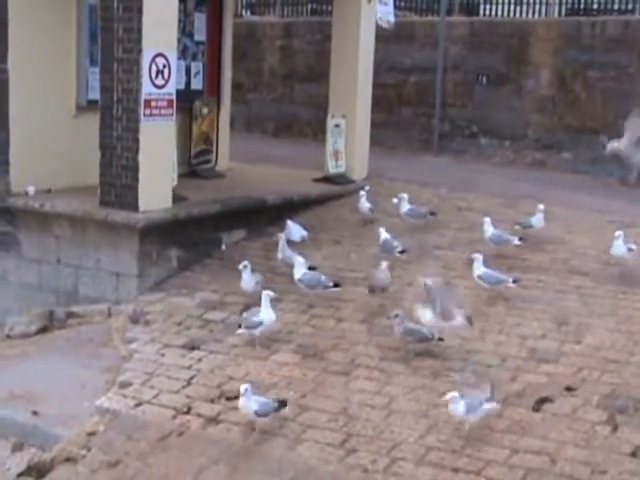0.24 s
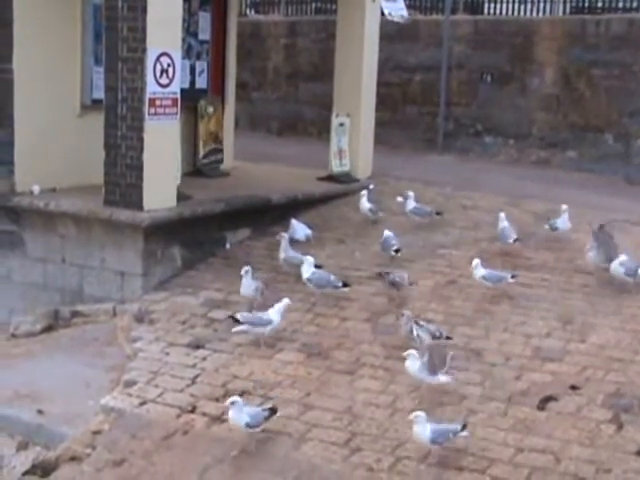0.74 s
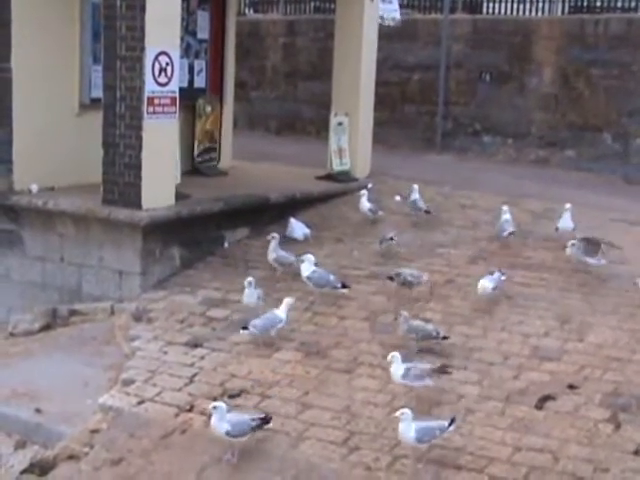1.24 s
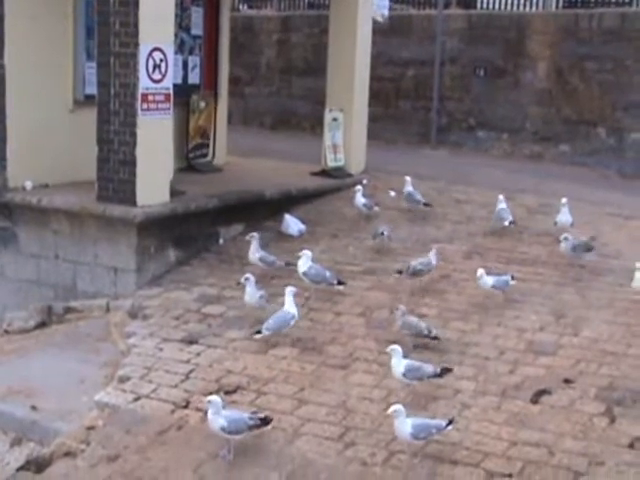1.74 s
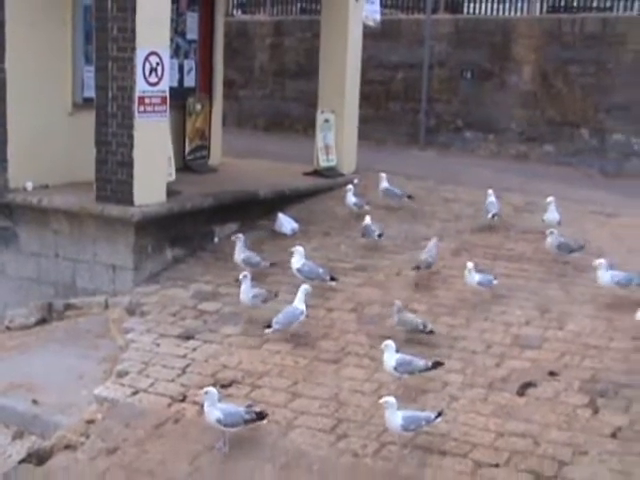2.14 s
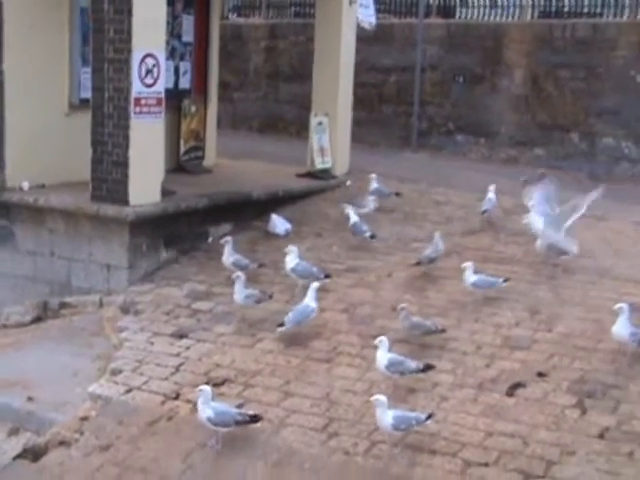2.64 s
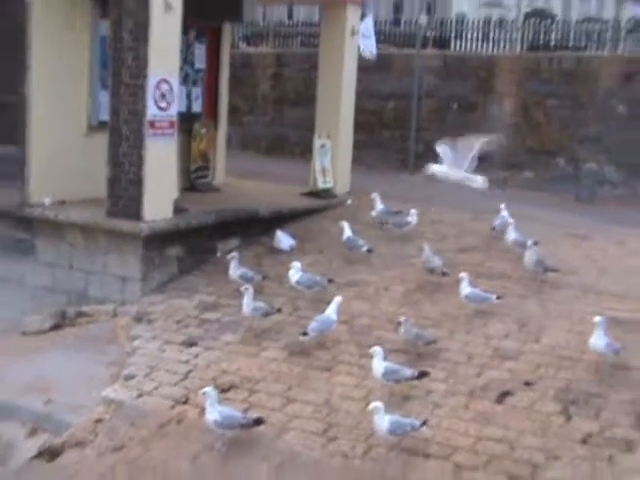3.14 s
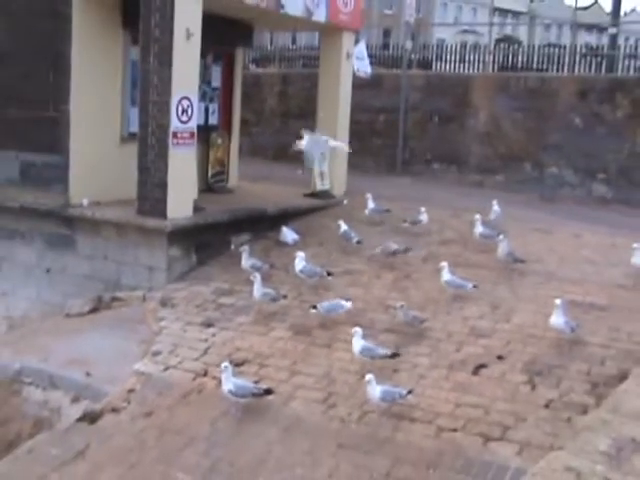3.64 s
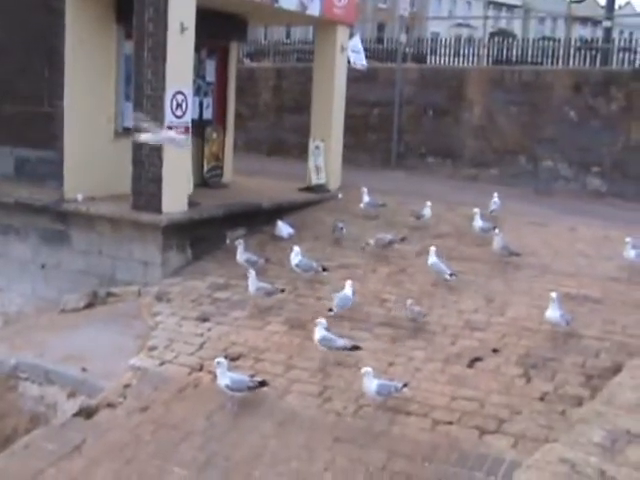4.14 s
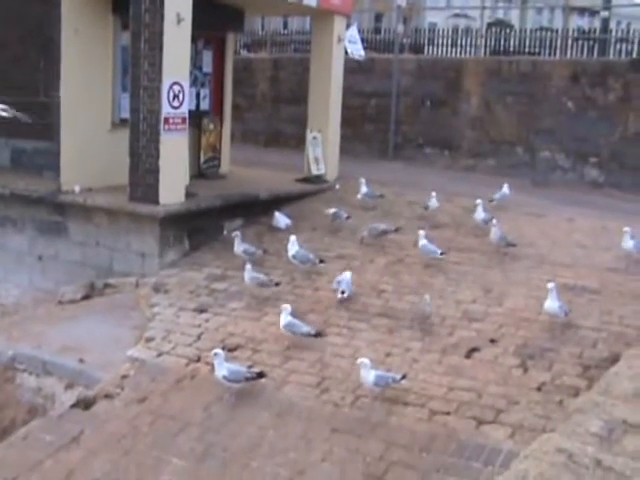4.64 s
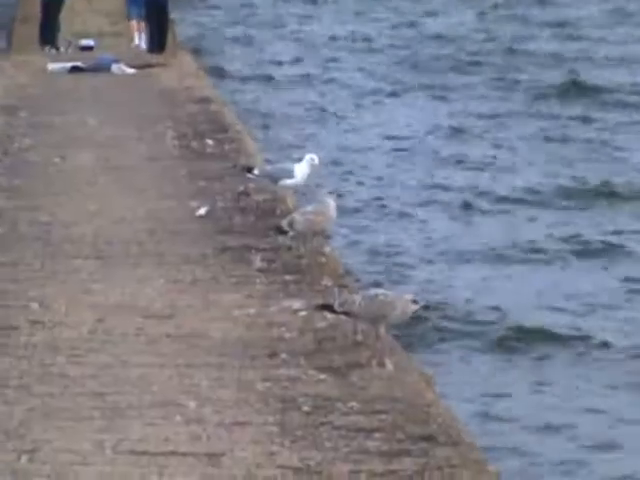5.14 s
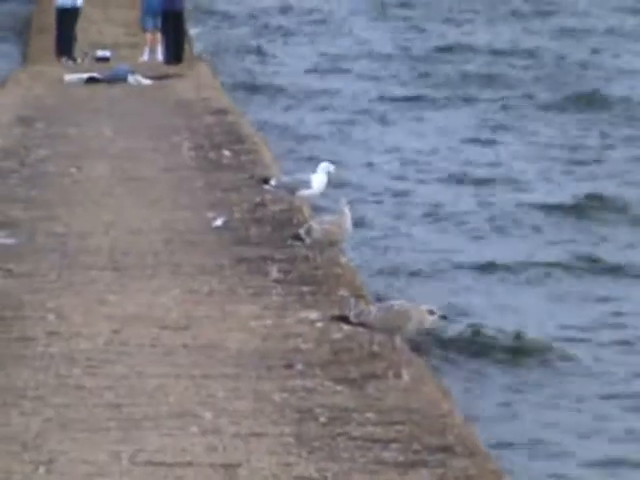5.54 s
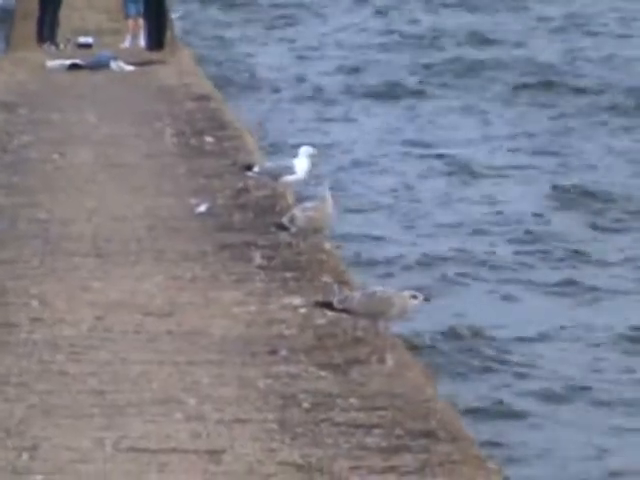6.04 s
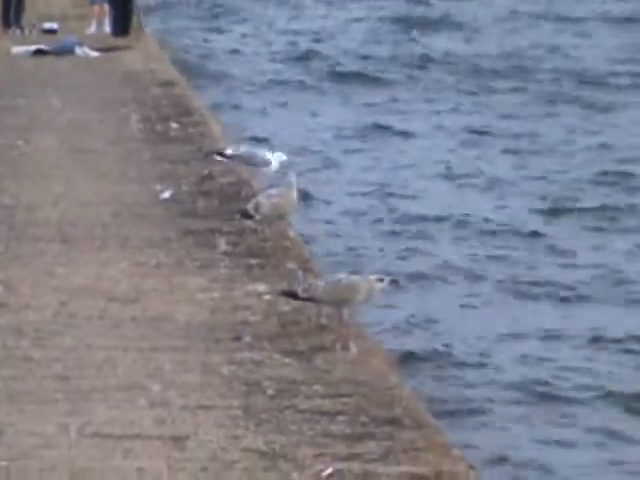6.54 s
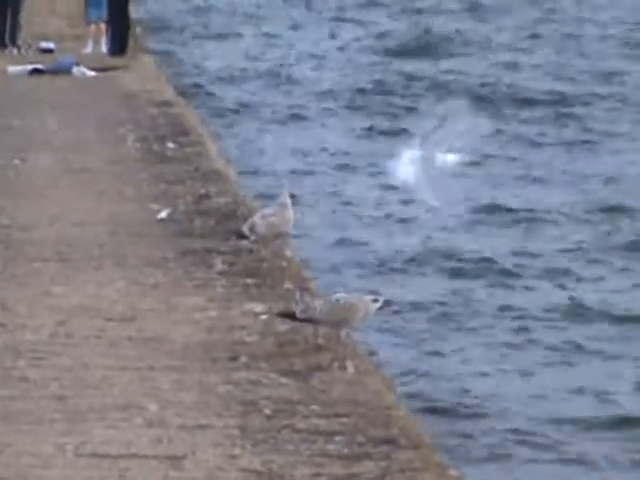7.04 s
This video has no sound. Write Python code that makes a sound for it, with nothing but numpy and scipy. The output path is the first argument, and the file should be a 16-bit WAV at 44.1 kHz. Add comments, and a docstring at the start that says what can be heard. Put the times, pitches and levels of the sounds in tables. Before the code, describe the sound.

A busy gull flock cries almost without pause for nearly five seconds, near birds clear and raspy, distant ones faint, over a soft harbour wash. Strong low wind buffets the handheld-style stereo microphone with thuds and sharp pops. A hard cut leaves a very brief silence, then closer waves wash beside a pier, broad and hissy, slowly easing, while separate gusts rumble and bump the microphone.

```python
"""A slipway between stone walls: gulls cry over each other while wind buffets a stereo microphone.
After a short silent cut the same microphone stands on a pier: washing waves, gusts of rumble.
Gulls are wavering harmonic stacks with breath noise, echoed by decaying noise for the walls.
Harbour and waves are flickering bands of noise; wind is low noise swelling in eddies, with sharp pops."""
import sys
import numpy as np
from scipy import signal
from scipy.fft import rfft, irfft, next_fast_len
from scipy.io import wavfile
from scipy.ndimage import uniform_filter1d

SR = 44100
rng = np.random.default_rng(int(sys.argv[2]) if len(sys.argv) > 2 else 0)


def store_pcm(level_fs):
    """Save levels as 16-bit WAV."""
    pcm = np.round(np.clip(level_fs, -1, 1) * 32767).astype(np.int16)
    wavfile.write(sys.argv[1], SR, np.atleast_2d(pcm).T)


def volts(x):
    """Linear amplitude factor 10**(x/20) for a level x in dB, scalar or array-like."""
    e = np.asarray(x, float) / 20
    return 10 ** e


N = 322371
T = np.arange(N) / SR
# multiplies a left-right difference: plus on the left, minus on the right
STEREO = np.array([[1], [-1]])

# The silent cut: end of the slipway [s], start of the pier [s].
CUT_S = 4.8285, 4.8919
# Swells on the pier. Each row: time [s], wave level before a fixed lift [dB], wind rumble level [dB].
PIER = [(4.9, -25.5, -35.5), (5.22, -25, -34), (5.32, -27.5, -19), (5.6, -25.5, -24), (6.0, -26.5, -29),
        (6.42, -28.5, -27.5), (6.5, -28.5, -22.5), (6.8, -29.5, -29), (6.95, -30, -19.5),
        (7.05, -30, -25.5), (7.31, -30, -28.5)]


def colour(x, points):
    """Shape a signal by (Hz, dB) points joined on a log-frequency axis."""
    size = next_fast_len(N)
    hz, db = np.transpose(points)
    bins_hz = np.arange(size // 2 + 1) * SR / size
    gain = volts(np.interp(np.log(bins_hz + 1), np.log(hz), db))
    return irfft(rfft(x, size) * gain, size)[..., :N]


def unit(x):
    """Scale to rms 1."""
    return x / np.sqrt(np.mean(x ** 2))


def walk(rate, size=N):
    """Random levels held 1 / rate s and slewed twice; spread near 1."""
    hold = max(int(SR / rate), 1)
    steps = np.repeat(rng.standard_normal(size // hold + 1), hold)
    slewed = uniform_filter1d(uniform_filter1d(steps, hold), hold)
    return np.sqrt(2) * slewed[:size]


def curve(table, column):
    """One table column read at every sample."""
    table = np.array(table)
    return np.interp(T, table[:, 0], table[:, column])


def contour(s, length_s, held_hz, last_hz, db, flat, rise_s, fall_s, soft_db, spent_db):
    """Rows (s, Hz, dB) of a call: the voice scoops up to its note, holds it, drops as the air runs out."""
    t = np.linspace(0, length_s, 60)
    early = np.exp(-t / rise_s)
    late = np.expm1(t / fall_s) / np.expm1(length_s / fall_s)
    hz = held_hz * (1 - flat * early) - (held_hz - last_hz) * late
    return np.transpose([s + t, hz, db - soft_db * early - spent_db * late])


def cry(points, lift_db, hoarse, close_db, harmonics_db, edge_s=0.013):
    """A harmonic stack on a wavering pitch; the voice turns raspy and airy where the pitch drops fast."""
    s, hz, db = np.transpose(points)
    start = max(int((s[0] - edge_s / 2) * SR), 0)
    t = np.arange(start, int((s[-1] + edge_s / 2) * SR)) / SR
    size = len(t)
    glide = uniform_filter1d(np.interp(t, s, hz), size=600)
    fall_rate = -np.gradient(np.log(glide)) * SR
    strain = hoarse * (1 + np.clip(fall_rate / 1.8, 0, 2.2))
    pitch = glide * (1 + .003 * walk(60, size) + .02 * hoarse * walk(400, size))
    # overtones above the listed ones fade by a steady slope
    harmonics_db = np.append(harmonics_db, harmonics_db[-1] - 3.5 * np.arange(1, 5 + 1))
    order = np.arange(len(harmonics_db))[:, None] + 1
    # the bill closes as the pitch sinks, dulling the overtones
    lift_db = lift_db - close_db * np.log2(glide.max() / glide)
    weight = volts(harmonics_db[:, None] + lift_db * np.log2(order))
    weight = weight / np.sqrt(np.sum(weight ** 2, axis=0))
    weight = weight * (order * pitch < SR / 3)
    # each harmonic flutters on its own, then the whole voice catches
    flutter = np.array([volts(hoarse * (4 * walk(25, size) + 5 * walk(80, size))) for _ in order])
    flutter = flutter * volts(4.5 * hoarse * walk(60, size))
    flutter = flutter / np.sqrt(np.mean(flutter ** 2, axis=1, keepdims=True))
    phase = 2 * np.pi * np.cumsum(pitch) / SR
    tone = volts(4.5) * np.sum(weight * flutter * np.sin(order * phase), axis=0)
    rasp = 1 + strain / 2 * walk(900, size)
    # differencing tilts the breath noise towards the treble
    air = volts(-23) * strain * np.diff(rng.standard_normal(size + 1))
    edge = np.clip(np.minimum(t - t[0], t[-1] - t) / edge_s, 0, 1)
    return start, (tone * rasp + air) * edge * volts(np.interp(t, s, db))


def near_calls():
    """Near birds, each kind of call with its own pitch shape, place, hoarseness and harmonics."""
    # Seven kinds of call. Each row: start [s], length [s], held pitch [Hz], last pitch [Hz],
    # relative level [dB] and, where given, bill opening as overtone lift [dB per octave].
    YELPS = [(0.0, 0.135, 1450, 1510, -27.5, 1), (.13, .22, 1560, 1222, -22, 1.5),
             (.32, .1, 1520, 1490, -33, 9), (.57, .1, 1341, 1214, -30, -6),
             (.675, .315, 1515, 1270, -19, 5), (1.07, 0.093, 1500, 1496, -22.5, 2.5),
             (1.19, .05, 1610, 1620, -29.5, 7), (1.26, .36, 1492, 1275, -18.5, 4),
             (1.7, .14, 1520, 1390, -26, 1.1), (1.84, .12, 1450, 1440, -28, -10),
             (1.91, .3, 1504, 1310, -19, 3.5), (2.23, 0.044, 1623, 1610, -31, 3),
             (2.37, .165, 1560, 1340, -22.5, 3), (2.45, .15, 1390, 1350, -24, -12),
             (2.46, .22, 1530, 1610, -27, -3), (2.76, .16, 1590, 1290, -23, 2.5),
             (3.0, .16, 1530, 1600, -24.5, -2.5), (3.39, .21, 1497, 1324, -30, -4.5),
             (3.72, .18, 1490, 1218, -30, -1.5), (3.78, .09, 1600, 1600, -23, -4),
             (4.05, 0.2, 1520, 1324, -31, 0), (4.26, .07, 1698, 1383, -21.5, -15),
             (4.37, 0.21, 1490, 1286, -31.5, -5), (4.73, .1, 1430, 1440, -27, -6.5)]
    CLIMBS = [(3.17, .108, 1700, 1440, -24, -3), (2.63, .35, 1770, 1150, -29, -9),
              (3.9, .19, 1990, 1331, -27, -12)]
    MEWS = [(0.0, .43, 1021, 990, -36), (.11, .325, 1134, 1130, -33), (.96, .58, 1052, 1046, -38, -16),
            (2.48, 1.09, 1029, 945, -34), (4.43, .4, 1061, 1030, -41)]
    BARKS = [(.31, 0.055, 1100, 1058, -27), (.55, 0.048, 1125, 1060, -26), (.76, 0.071, 1163, 1060, -23),
             (.86, 0.068, 1244, 1143, -27.5), (1.02, 0.084, 1194, 1045, -26.5),
             (1.26, .08, 1190, 1062, -30), (1.52, 0.07, 1186, 1080, -31.5), (1.79, 0.08, 1188, 1080, -26),
             (2.04, 0.086, 1195, 1090, -31)]
    WHISTLES = [(2.27, .12, 2760, 2200, -29, 1.5), (2.57, .1, 2760, 2240, -30),
                (2.83, .11, 2800, 2200, -31), (3.25, .25, 1790, 1800, -41),
                (3.48, .095, 1970, 1690, -26, -12), (3.885, .36, 2530, 2480, -33, -9),
                (4.255, .035, 2640, 2100, -26, -4), (4.575, .115, 2480, 2440, -39),
                (4.7, 0.04, 2480, 2030, -26, -5)]
    WAILS = [(3.945, .33, 869, 801, -26), (4.485, .25, 870, 754, -29, -3)]
    PIPES = [(.46, .18, 2150, 2005, -38), (2.21, .15, 2160, 2050, -42), (2.43, .05, 2150, 2130, -36),
             (3.49, .19, 2500, 2360, -38), (4.57, .15, 2110, 1960, -37), (4.32, 0.28, 2520, 2340, -39)]
    # The voice of each kind. Each row: calls, shape, left minus right [dB], hoarseness [0-1],
    # closing (overtone lift lost per octave under the top of the call) [dB], harmonic levels [dB].
    # Each shape: flat start [share of pitch], rise [s], fall [s], soft start [dB], soft end [dB].
    birds = [(YELPS, (.05, .035, .045, 9, 1.5),
             1.5, 0.38, 30, [-3.6, -2.5, -18.5, -36, -33, -38, -37, -36]), (CLIMBS, (.15, .17, .026, 3, -5),
             1.4, 0.3, 5, [-2, -4, -21, -35.5, -36]), (MEWS, (.025, 0.07, .09, 5, -2),
             -.5, 0.2, 5, [-21, -3, -29]), (BARKS, (0.0048, .012, .12, 5, 1.2),
             -6, 0.3, 180, [-38, -11.5, -2, -16, -22, -16, -22]), (WHISTLES, (.07, .025, .13, 4, -1.3),
             -.5, .33, 5, [-1, -5, -20, -26]), (PIPES, (.03, .025, .15, 3, 4),
             .5, 0.086, 5, [-28, -1, -30, -19]), (WAILS, (.075, .022, .09, 5, .4),
             0.45, 0.65, 5, [-35, -22, -15.5, 1, -15, -18, -27, -22, -20, -22])]
    calls = []
    for table, shape, pan_db, hoarse, close_db, harmonics_db in birds:
        for row in table:
            points = contour(*row[:5], *shape)
            lift_db = sum(row[5:])  # zero where the row gives none
            calls.append((points, lift_db, hoarse, close_db, harmonics_db, pan_db))
    return calls


def far_yelps():
    """A crowd of short, quiet, hoarse yelps: each a quick rise in pitch, then a steep fall."""
    calls = []
    for when, high, long, loud, side in rng.random(size=(60, 5)):
        s, hz, db = when * CUT_S[0], 1050 + 650 * high, -46 + 8 * loud
        top_s, end_s = s + 0.0189 + 0.0507 * long, s + .05 + .09 * long
        points = [(s, hz, db), (top_s, 1.04 * hz, db), (end_s, .88 * hz, db)]
        calls.append((points, 0, .6, 15, [-6, -8.0, -5.0, -18], 8 * (side - .5)))
    return calls


def stone_walls(voices):
    """Dense reflections of the voices: noise on a 60 dB decay of 0.14 s, silent for its first 12 ms."""
    t = T[:SR // 2]
    decay = np.exp(-np.log(1000) * t / 0.14) * (t > .012)
    mid, side = rng.standard_normal((2, len(t))) * decay
    walls = (mid + 0.65 * side * STEREO) / np.sqrt(np.sum(mid ** 2))
    return volts(-9) * signal.fftconvolve(voices.mean(axis=0)[None], walls, axes=1)[:, :N]


def gulls():
    """Every near bird at its place and a crowd of short far yelps, answered by the stone walls."""
    out = np.zeros((2, N))
    for *call, pan_db in near_calls() + far_yelps():
        start, voice = cry(*call)
        out[:, start:start + len(voice)] += voice * volts(STEREO * pan_db / 2)
    return out + stone_walls(out)


def wash(points, width, flicker_db):
    """Broad noise whose octave bands flicker on their own; mostly the same left and right."""
    out = 0
    for hz in 60 * 2. ** np.arange(9):
        band = [(hz / 2, -40), (hz / 2 ** .5, -3), (hz * 2 ** .5, -3), (hz * 2, -40)]
        mid, side = colour(rng.standard_normal((2, N)), band)
        out = out + volts(flicker_db * walk(12)) * (mid + width * side * STEREO)
    return unit(colour(out, points))


def harbour():
    """The slipway's steady background: a soft wash of noise that thins out towards the treble."""
    # Spectrum of the background. Each row: frequency [Hz], relative level [dB per Hz].
    harbour_spectrum = [(600, -1), (1470, 0.5), (2980, -10), (11000, -25.5)]
    return volts(-33.5) * wash(harbour_spectrum, width=0.38, flicker_db=0.68)


def wind():
    """Turbulence at the ports: a shared thudding rumble and a spikier left-right part, both in eddies."""
    # Wind on the slipway. Each row: time [s], rumble level [dB].
    slip = [(0, -17), (4.82, -15.5)]
    # Spectrum of the shared rumble. Each row: frequency [Hz], gain [dB].
    rumble_mid = [(20, -10.5), (110, -1), (200, -5), (546, -24), (3000, -68)]
    # Spectrum of the left-right rumble. Each row: frequency [Hz], gain [dB].
    rumble_side = [(30, -16), (171, -3.5), (339, -12), (495, -16), (3000, -68)]
    # Hard hits, opposite in sign left and right, after which the left-right rumble goes still.
    # Each row: time [s], signed peak on the left [before the windward tilt], lull [s].
    hits = [(0.427, -0.43, 0.063), (1.159, -0.37, .058), (1.509, 0.72, 0.033), (1.608, -1.1, 0.031),
            (2.21, -1.4, 0.026), (3.464, -1.3, 0.05), (3.924, -0.89, 0.029), (5.884, 0.82, 0.089),
            (6.9, -0.77, .035)]
    on_slipway = T < CUT_S[1]
    level = volts(np.where(on_slipway, curve(slip, 1), curve(PIER, 2)))
    eddies = walk(45)
    # the upper rumble swells as an eddy strikes
    roll = colour(rng.standard_normal(N) * volts(2.17 * eddies), [(200, -1.5), (400, -7.5)])
    thuds = colour(unit(rng.standard_normal(N) * volts(5.5 * eddies)), [(120, -15), (300, 1)])
    mid = colour(roll + thuds, rumble_mid)
    # on the open pier the shared rumble sits deeper
    mid = np.where(on_slipway, mid, colour(mid, [(60, 7.5), (200, -11.0)]))
    mid = unit(mid) * level
    spikes_db = 4.8 * eddies + 5.4 * walk(75) + 0.51 * walk(12)
    side = colour(rng.standard_normal(N) * volts(spikes_db), rumble_side)
    side = volts(0.64) * unit(side) * level
    awake, pops = np.ones(N), np.zeros(N)
    for s, peak, lull_s in hits:
        lull = np.minimum((T - s) / .002, (s + lull_s + 0.014 - T) / 0.013)
        awake *= 1 - 0.94 * np.clip(lull, 0, 1)
        # a short push, with a small swing the other way just before it
        push = np.exp(-((T - s) / 0.00053) ** 2)
        swing = np.exp(-((T - s + 0.0026) / 0.0015) ** 2)
        pops += peak * (push - 0.16 * swing)
    # louder on the left on the slipway, on the right on the pier
    windward = volts(np.where(on_slipway, .9, -.9) * STEREO / 2)
    return (mid + (side * awake + pops) * STEREO) * windward


def waves():
    """Water washing at the pier: flickering broad noise on a moving level, a little louder on the right."""
    # Spectrum of the water. Each row: frequency [Hz], relative level [dB per Hz].
    wave_spectrum = [(60, 1.5), (500, 0), (1300, -5), (6970, -18.5), (12000, -20)]
    level_db = curve(PIER, 1) + 4.5
    pan_db = -1.55  # left minus right
    return volts(level_db + pan_db * STEREO / 2) * wash(wave_spectrum, width=0.31, flicker_db=0.81)


def scene():
    """Slipway, a cut to silence, pier."""
    gale = wind()
    slipway = gulls() + harbour() + gale
    pier = waves() + gale
    return slipway * (T < CUT_S[0]) + pier * (T > CUT_S[1])


def top_cut(x):
    """Nothing passes above the cut-off."""
    return signal.sosfilt(signal.butter(12, 13340, fs=SR, output="sos"), x)


def record(dry):
    """Gain control pulls everything down under thumps; the top rolls off and the loudest peaks clip."""
    keep = np.exp(-1 / (0.023 * SR))  # power averaged over about 23 ms
    power = signal.lfilter([1 - keep], [1, -keep], np.mean(dry ** 2, axis=0))
    threshold = volts(-19.5) ** 2
    gain = np.minimum(threshold / (power + 1e-12), 1) ** 0.21
    even = colour(dry * gain * volts(2.5), [(9000, 0), (11500, -11.5), (13000, -29)])
    return top_cut(np.clip(even, -1, 1))


dry = scene()
out = record(dry)
store_pcm(out)
```